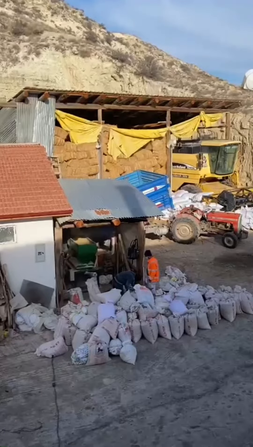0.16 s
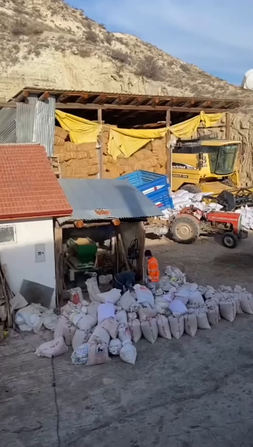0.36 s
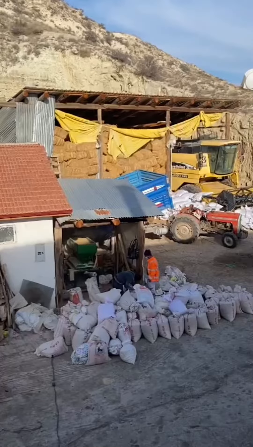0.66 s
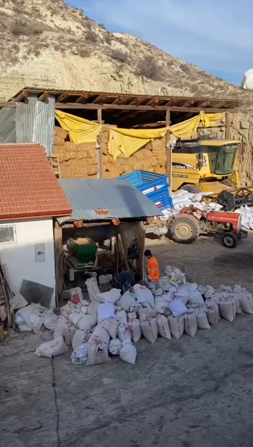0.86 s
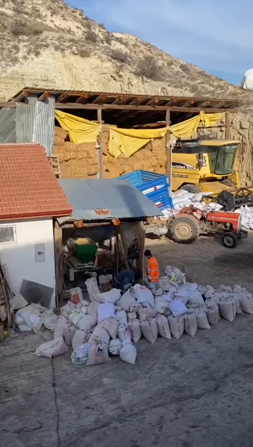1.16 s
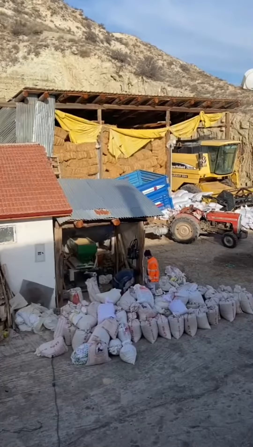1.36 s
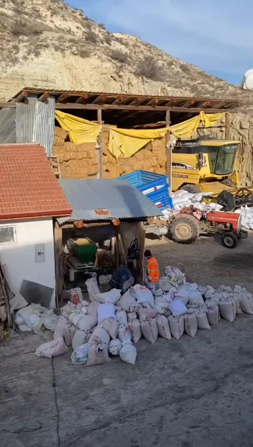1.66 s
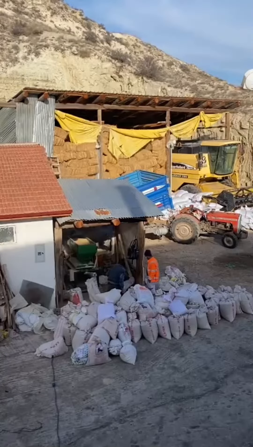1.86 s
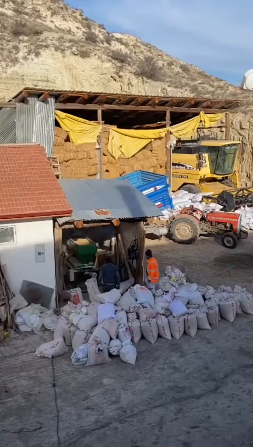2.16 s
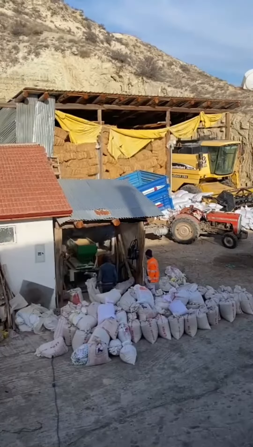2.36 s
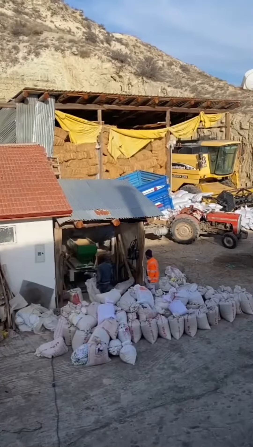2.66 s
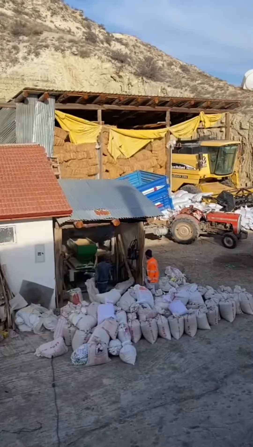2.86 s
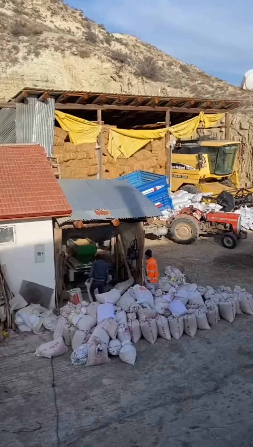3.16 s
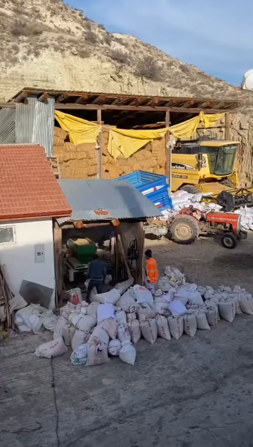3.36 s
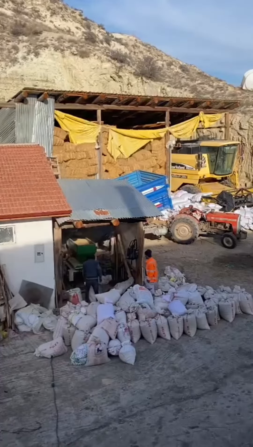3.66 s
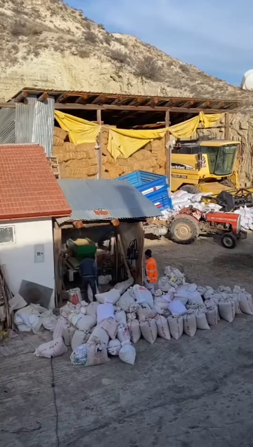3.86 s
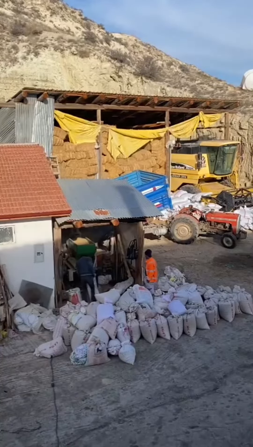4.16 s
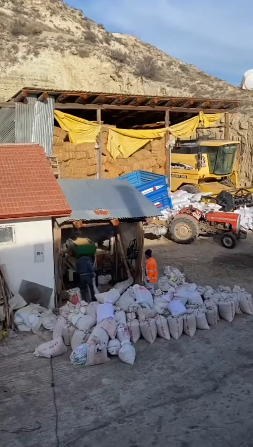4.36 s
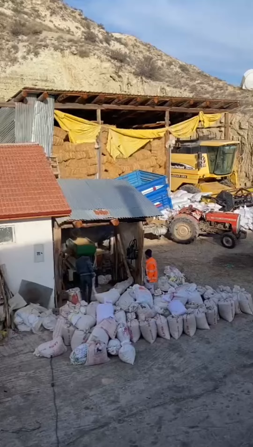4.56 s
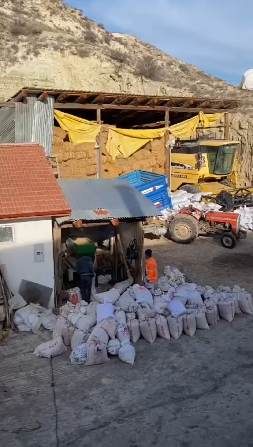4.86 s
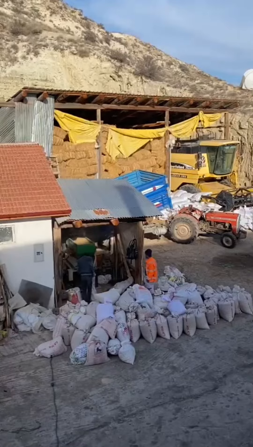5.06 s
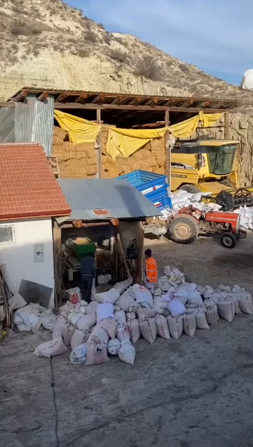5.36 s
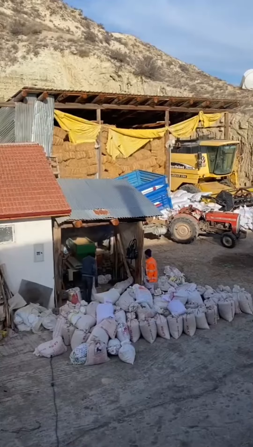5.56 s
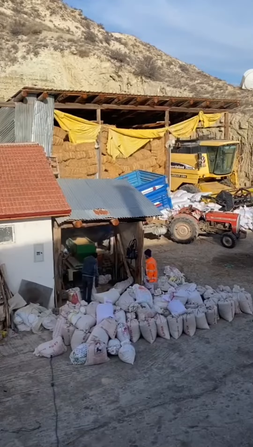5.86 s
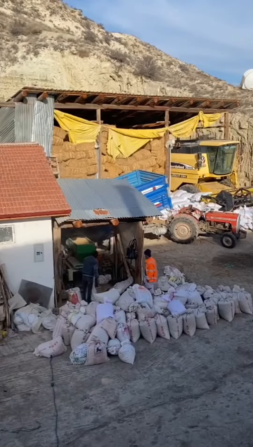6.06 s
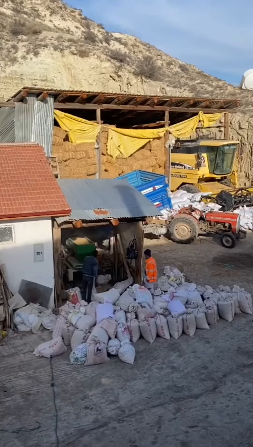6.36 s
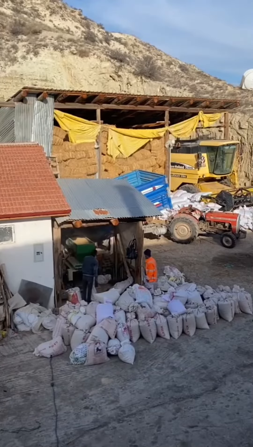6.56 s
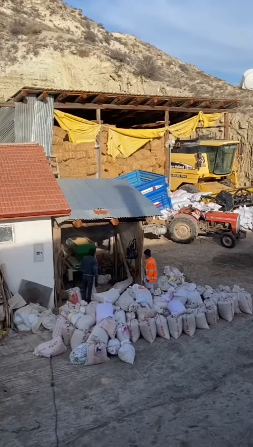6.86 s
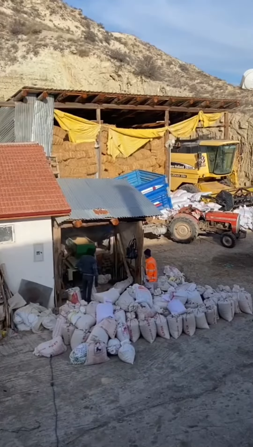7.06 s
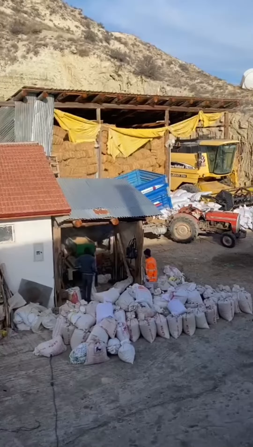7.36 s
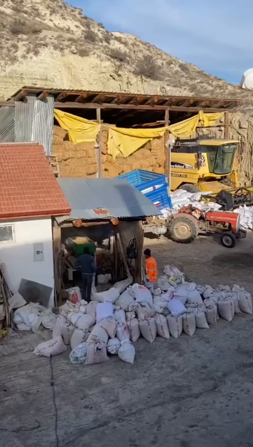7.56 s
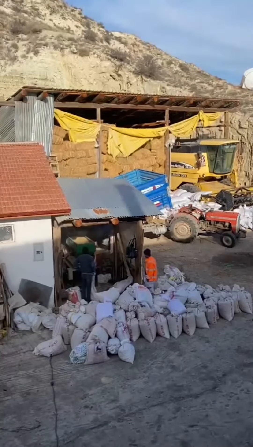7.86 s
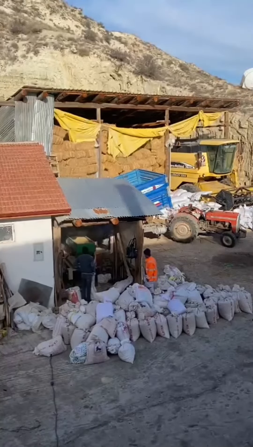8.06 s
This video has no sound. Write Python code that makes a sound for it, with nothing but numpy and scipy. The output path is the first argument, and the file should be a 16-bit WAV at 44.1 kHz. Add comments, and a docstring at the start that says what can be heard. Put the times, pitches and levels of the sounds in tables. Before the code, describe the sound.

A grain mill runs without a break, making a low rumble, a rough roar and a faint hum with a slight fast throb. Grain crunches through in quick, uneven surges, hissing and rattling the sheet metal. Soft knocks from the casing, brief rings from the steel hopper and small kernel clicks are scattered throughout. The sound dulls a little past the middle, then picks up again. It is heard across a farmyard on a handheld camera.

```python
"""A roar, a hum and a hiss of kernels: a grain mill running under a tin roof, across a farm yard.
The casing roars, the frame hums, and the main shaft throbs the noise once and twice a turn.
Surges of grain crunch through and rattle the sheet metal; the casing knocks, lumps ring the steel
hopper and hard kernels click on the sheet. Heard on a handheld camera, through two close
microphone ports that take in both straight and scattered sound."""
import sys
import numpy as np
from scipy import signal
from scipy.fft import rfft, irfft, next_fast_len
from scipy.io import wavfile
from scipy.ndimage import uniform_filter1d, map_coordinates

SR = 44100
rng = np.random.default_rng(int(sys.argv[2]) if len(sys.argv) > 2 else 0)


def dump(signal):
    """Clip the signal to [-1, 1] and save it as 16-bit WAV at the path in sys.argv[1]."""
    limited = np.clip(np.atleast_2d(signal).T, -1, 1)
    pcm = np.round(limited * 32767).astype(np.int16)
    wavfile.write(sys.argv[1], SR, pcm)


N = 362061
SHAFT_HZ, USUAL_LOAD_DB = 7.27, -34.5

# how hard the mill is fed: (time [s], load [dB], casing roar [dB])
MILL_LOAD = [(0.0, -31.5, -25), (0.82, -32.5, -25.5), (1.19, -32.5, -27), (1.51, -33, -25),
             (1.85, -30.5, -25), (2.17, -34.5, -27.5), (2.4, -32.5, -28.5), (2.7, -32.5, -26.5),
             (2.96, -35.5, -28.5), (3.06, -34, -28.5), (3.29, -33.5, -25.5), (3.68, -35.5, -27.5),
             (4.18, -35.5, -28.5), (4.64, -38, -27.5), (5.01, -36.5, -28.5), (5.33, -38, -28),
             (5.52, -37.5, -29), (5.6, -37.5, -28), (6.1, -37, -26.5), (6.3, -34.5, -26.5),
             (6.77, -34, -25), (7.11, -33.5, -26), (7.5, -37, -26.5), (7.8, -38, -26.5), (8.21, -34.5, -26)]
# the frame rumble's lowest band: (time [s], level [dB])
FRAME_LEVEL = [(0, -30), (.4, -28), (.65, -32.5), (.85, -29.5), (1.15, -34.5), (1.4, -30.5), (1.9, -30),
               (2.2, -32.5), (2.55, -31), (2.9, -31), (3.2, -30.5), (3.65, -33.5), (3.78, -29),
               (4.05, -32.5), (4.3, -30.5), (4.7, -33), (5.4, -31.5), (5.75, -32), (6.1, -33.5),
               (6.45, -30.5), (6.8, -32), (7, -31), (7.35, -30.5), (7.6, -31.5), (7.8, -35), (8.08, -28.5),
               (8.21, -39)]
# tones of the frame: (frequency [Hz], rms level [dB])
FRAME_TONES = [(58, -47.5), (65, -47), (86.5, -41), (101, -46.5), (114.3, -39.5), (137, -44.5),
               (267, -43.5), (278, -42.5)]
# resonances of frame, casing and hopper: (frequency [Hz], width [Hz], gain [dB])
BODY_RESONANCES = [(63, 10, 4), (86, 10, 4), (101, 6, 2), (114, 10, 5), (136, 12, 3), (166, 20, 5),
                   (200, 25, 3), (268, 18, 4.5), (320, 14, 3), (349, 22, 5), (410, 18, 5), (484, 35, 3.5),
                   (790, 60, 2), (940, 50, 4), (1001, 40, 5), (1300, 90, 4), (1576, 40, 3), (1800, 60, 3),
                   (2050, 90, 5), (2600, 120, 3), (2835, 60, 4), (3650, 90, 3), (5250, 110, 3),
                   (6450, 200, -4), (7620, 300, 1.5), (8370, 130, 2.5), (8850, 80, 1.5)]
# narrow valleys between them: (frequency [Hz], width [Hz], gain [dB])
BODY_VALLEYS = [(72.5, 7, -6), (96, 9.2, -3.5), (122, 5.2, -13.5), (178.6, 6.9, -5.5), (284, 9.7, -6.5),
                (306, 6.1, -2), (341, 10, -3.5), (437, 55, -5), (935, 18, -3), (256.6, 11, -1.5),
                (392, 16, -5.5), (970, 15, -0.5), (1075, 34, -4), (1400, 56, -5.5), (2120, 40, -5.5),
                (2420, 58, -6.5), (2900, 53, -2.5), (3240, 80, -2)]
# modes of the sheet-steel hopper: (frequency [Hz], relative level [dB], undamped t60 [s])
HOPPER_MODES = [(788, 1.5, 0.13), (942, 11.5, 0.13), (998.7, 9, 0.097), (1337, 6.5, 0.066),
                (1560, -2.5, 0.081), (1690, -6.5, 0.064), (1825, -14.5, 0.069), (2052, 7.5, 0.073),
                (2160, 7, 0.099), (2226, -2, 0.11), (2583, 2.5, 0.074), (2710, 4, 0.05),
                (2840, -1.5, 0.086), (3108, -4, 0.055), (3673, -6, .06), (4470, -10, .06),
                (4870, -10, .064), (5130, -7.5, 0.058), (5270, -7, 0.058), (5700, -6.5, .05),
                (5900, -8, .05)]

# frame rumble: (frequency [Hz], relative level [dB])
RUMBLE_SPECTRUM = [(15, -61), (28, -33), (45, -19), (58, -6), (100, 1.5), (200, 1.5), (300, -5.5),
                   (450, -55)]
# casing roar: (frequency [Hz], relative level [dB])
ROAR_SPECTRUM = [(150, -19.5), (250, -1.5), (400, 1.5), (700, -4), (1020, -6.5), (1080, -7.5), (1360, -11),
                 (1420, -18), (2000, -44)]
# grain being ground: (frequency [Hz], relative level [dB])
GRIND_SPECTRUM = [(1000, -52), (1400, -2), (2200, -0.5), (2420, -3.5), (2700, -3.5), (3200, -5),
                  (3700, -10), (4500, -32)]
# kernels thrown against the steel screen: (frequency [Hz], relative level [dB])
SPRAY_SPECTRUM = [(2800, -33.5), (3700, -0.5), (4500, 0), (5800, -3), (6400, -4.5), (7200, -24.5)]
# kernel hiss: (frequency [Hz], relative level [dB])
HISS_SPECTRUM = [(4500, -32), (6300, -11), (6800, 3.5), (8800, -0.5), (9300, -4), (10500, -3), (11500, -21),
                 (12000, -42)]
# loose sheet rattling: (frequency [Hz], relative level [dB])
RATTLE_SPECTRUM = [(5000, -36), (6400, 3), (6900, 3), (8000, -2), (9000, -1), (9400, -10.5), (11500, -14.5),
                   (12000, -37)]
# a surge crunching through: (frequency [Hz], relative level [dB])
CRUNCH_SPECTRUM = [(250, -10), (600, 6.5), (1000, -1), (1100, -0.5), (1500, -7), (2500, -6.5),
                   (3500, -10.5), (4500, -28)]
# a knock of the casing: (frequency [Hz], relative level [dB])
KNOCK_SPECTRUM = [(120, -29), (200, -0.5), (350, 4), (600, -2.5), (900, -10), (1300, -37.5)]
# a click on the sheet: (frequency [Hz], gain [dB])
CLICK_SPECTRUM = [(3000, -33), (4500, -2), (6300, -4), (7000, 8), (9000, 0.5), (10500, -8.5), (12000, -18)]

# heavy surges of grain: (start [s], hold [s], sheet rattle [dB], spray [dB], crunch [dB])
HEAVY_SURGES = [(0.04, 0.025, -43, -37, -43), (0.099, 0.022, -37.5, -42, -34),
                (0.252, 0.016, -43, -43, -32), (0.46, .022, -38, -37, -30.5),
                (0.513, 0.013, -39.5, -46, -27), (0.647, 0.021, -39, -39, -30.5),
                (0.726, .015, -46, -38, -38), (0.789, .01, -39.5, -45, -28.5),
                (0.87, 0.014, -40, -38.5, -46), (0.995, 0.032, -47, -44, -50),
                (1.116, 0.0093, -41, -41, -43), (1.216, 0.019, -42, -41, -35.5),
                (1.275, 0.016, -45, -46, -32), (1.428, 0.012, -47, -42, -41), (1.688, 0.036, -42, -45, -32),
                (1.744, 0.022, -42, -41, -31), (1.902, 0.036, -40, -37, -27), (1.965, .04, -47, -39, -29),
                (2.346, 0.063, -47, -42, -47), (2.725, 0.02, -45, -44, -27.5),
                (3.083, 0.015, -41, -41.5, -29.5), (3.145, 0.026, -42, -45, -30),
                (3.211, 0.024, -47, -39.5, -34.5), (3.282, 0.014, -42, -41, -32),
                (3.355, .022, -39.5, -43, -38), (3.425, 0.02, -38, -39, -29), (3.5, 0.015, -36, -45, -46),
                (3.529, 0.011, -45, -40, -47), (3.648, .018, -40, -42.5, -45),
                (3.764, 0.014, -43, -44.5, -38), (4.291, 0.05, -42.5, -45, -34.5),
                (4.72, 0.022, -53, -44.5, -44), (4.808, 0.038, -47, -46, -34.5),
                (4.923, 0.018, -50, -43, -37.5), (5.063, 0.013, -50, -48, -34),
                (5.157, 0.019, -48, -50, -37), (5.248, 0.032, -51, -48, -33.5),
                (5.664, 0.02, -44, -46.5, -31.5), (5.705, 0.013, -42, -44, -37),
                (5.832, 0.011, -53, -51, -29), (5.962, .02, -47, -43, -29.5),
                (6.003, 0.026, -41, -40.5, -32), (6.543, 0.022, -52, -44, -42), (6.623, .03, -41, -37, -28),
                (6.795, .021, -44, -39.5, -29), (6.911, .025, -38.5, -43.5, -31),
                (7.055, .028, -49, -48, -28.5), (7.181, 0.063, -42.5, -42, -29.5),
                (7.457, 0.037, -40, -41, -27.5), (7.598, 0.053, -46, -44, -32), (7.733, .02, -46, -48, -33),
                (7.87, 0.024, -46, -42.5, -37), (8.035, 0.014, -46, -39, -31)]
# low knocks of the casing: (middle time [s], level [dB])
CASING_KNOCKS = [(0.059, -26), (0.33, -24), (0.43, -23), (0.53, -22.5), (0.879, -25.5), (0.955, -26.5),
                 (1.113, -40), (1.775, -24.5), (1.928, -26.5), (1.986, -32.5), (2.355, -26), (2.53, -29),
                 (2.73, -32), (3.03, -25.5), (3.441, -24.5), (4.23, -29), (4.39, -27.5), (4.846, -28.5),
                 (4.93, -26.5), (5.277, -27.5), (5.7, -24), (5.74, -31), (5.989, -25.5), (6.272, -26.5),
                 (6.65, -25), (7.206, -25), (7.29, -30.5), (7.37, -25), (7.614, -23), (7.886, -24.5),
                 (8.034, -26.5)]
# lumps hitting the hopper: (time [s], level [dB], brightness [dB/octave], favoured frequency [Hz])
HOPPER_HITS = [(.225, -33, 4, 990), (.39, -34, 2, 942), (.508, -30, 2, 788), (.787, -27, -2, 2070),
               (1.07, -39, 3, 2030), (1.2, -33.5, 4, 970), (1.63, -36, 5, 942), (1.752, -34, -1.5, 2100),
               (1.892, -23, -4, 788), (2.055, -36, 0, 990), (2.595, -34, -4, 942), (2.718, -31.5, 7, 942),
               (2.84, -38, -1, 970), (3.145, -31, -5, 788), (3.147, -40, 0, 1690), (3.185, -32, 1, 975),
               (3.285, -40, 0, 997), (3.415, -23, -3, 2780), (3.424, -39, -12, 788), (3.44, -34, -2, 942),
               (4.165, -43, 6, 2052), (4.75, -39, -2, 2052), (5.41, -37, -2, 955), (5.965, -47, 7, 2800),
               (6.635, -56, 1, 788), (6.64, -45, 6, 2840), (6.856, -41, 5, 2160), (7.085, -44, 4, 2710),
               (7.19, -39, 12, 2720), (7.472, -35, 1, 2052)]
# single hard kernels on the sheet: (time [s], level before colouring [dB])
KERNEL_HITS = [(0.468, -35), (0.885, -36), (1.001, -38), (1.009, -33.5), (1.034, -36), (1.711, -35.5),
               (1.959, -35.5), (2.406, -33), (3.155, -36), (3.367, -35), (3.429, -23), (3.437, -33),
               (3.506, -33.5), (3.519, -32), (3.644, -32.5), (3.658, -32.5), (3.766, -38), (5.044, -38),
               (5.168, -36), (5.216, -41), (5.451, -37.5), (5.672, -43), (5.751, -40), (6.011, -37),
               (6.032, -41), (6.634, -37), (6.645, -40), (6.921, -38), (6.937, -38), (7.458, -37),
               (7.463, -36), (7.473, -36), (8.049, -40)]

# phase between the microphone ports: (frequency [Hz], left lead [turns])
PORT_LEAD = [(2250, 0), (2500, .055), (2850, 0), (4000, .02), (4400, .1), (4750, 0), (5400, .015),
             (5600, .055), (5800, .17), (6120, .28), (6420, .5), (8050, .5), (8350, .62), (8870, .73),
             (9250, .92), (9700, 1)]
# likeness of the two ports: (frequency [Hz], correlation [0..1])
PORT_LIKENESS = [(125, 1), (200, .995), (430, .985), (1800, .997), (2150, .995), (2480, .85), (2850, .99),
                 (3100, .96), (3350, .998), (3700, .95), (4400, .78), (4750, .9999), (5200, .9995),
                 (5500, .93), (6100, .58), (6450, 1), (7950, 1), (8300, .83), (9050, .56), (9500, .9),
                 (9850, .9995)]
# balance of the ports: (frequency [Hz], left minus right [dB])
PORT_BALANCE = [(120, 0), (280, -.7), (450, 1), (600, 3.4), (800, 4.2), (1300, 2.7), (1900, .1), (2350, 0),
                (2600, 2), (2950, -.5), (3300, 0)]


def amp(db):
    return 10 ** (np.asarray(db) / 20)


def unit_rms(x):
    return x / np.sqrt(np.mean(x ** 2) + 1e-20)


def along(points, hz):
    """Read (Hz, value) points on a log frequency axis."""
    f, v = np.transpose(points)
    return np.interp(np.log(hz + 1), np.log(f + 1), v)


def timeline(table, column=1):
    """One column of a timed table, at every sample."""
    columns = np.transpose(table)
    return np.interp(np.arange(N) / SR, columns[0], columns[column])


def wobble(rate):
    """A smooth random curve, rate knots a second."""
    return map_coordinates(rng.standard_normal(int(N * rate / SR) + 4), [np.arange(N) * rate / SR])


def filtered(x, response):
    """x times a complex response of frequency."""
    size = next_fast_len(N + 8192)
    return irfft(rfft(x, size) * response(np.fft.rfftfreq(size, 1 / SR)), size)[..., :N]


def body_gain(hz):
    """The mill's resonances and the valleys between them."""
    bands = BODY_RESONANCES + BODY_VALLEYS
    return amp(sum(db / (1 + (2 * (hz - centre) / width) ** 2) for centre, width, db in bands))


def body_noise(spectrum, patchy_db, grain_db):
    """Patchy, grainy noise through the mill's body, rms 1; rows are the straight and scattered paths."""
    cells = signal.stft(rng.standard_normal((2, N)), nperseg=512)[2]
    patches = uniform_filter1d(rng.standard_normal(cells.shape[1:]), size=8, axis=0)
    patches = unit_rms(uniform_filter1d(patches, size=8, axis=1))
    paths = signal.istft(cells * amp(patchy_db * patches), nperseg=512)[1][:, :N]
    grains = amp(grain_db * wobble(900))  # single kernels crack within about a millisecond
    colour = lambda hz: amp(np.clip(along(spectrum, hz), -120, 20)) * body_gain(hz)
    return unit_rms(filtered(paths * grains, colour))


def swell(t, hold, rise, fall):
    """A quick rise up to time 0, a hold, then an exponential fall; all in seconds."""
    return np.exp(-(np.minimum(t, 0) / rise) ** 2 - np.maximum(t - hold, 0) / fall)


def throb(once_db, twice_db):
    """Level swing once and twice a turn of the shaft."""
    turn = 2 * np.pi * SHAFT_HZ * np.arange(N) / SR
    return once_db * np.cos(turn + 3.4) + twice_db * np.cos(2 * turn + 1.7)


def frame_rumble():
    """The frame shakes low down, throbbing mostly twice a turn."""
    level_db = timeline(FRAME_LEVEL) + 2.5 + throb(0.11, 0.71)  # all bands: 2.5 dB over the lowest
    return amp(level_db) * body_noise(RUMBLE_SPECTRUM, patchy_db=0.8, grain_db=0.4)


def casing_roar(feed, lumps):
    """The casing roars, swaying with the uneven feed."""
    level_db = timeline(MILL_LOAD, column=2) + 0.57 * lumps + 0.094 * feed + throb(0.7, 0.3)
    return amp(level_db) * body_noise(ROAR_SPECTRUM, patchy_db=0.72, grain_db=1.5)


def hopper_pings(rate, spread_db, above_hz=0):
    """Stray kernels, some harder than others, ring each hopper mode rate times a second; rms 1."""
    hz, db, t60 = np.transpose(HOPPER_MODES)
    t, out = np.arange(SR // 8) / SR, np.zeros((2, N))
    for k in np.flatnonzero(hz > above_hz):
        draw = rng.random((2, N)) * SR / rate  # under 1 where a kernel lands
        blows = (draw < 1) * amp(db[k] - spread_db * np.log(draw + .04))
        ring = amp(-60 * t / t60[k]) * np.sin(2 * np.pi * hz[k] * t)
        out += signal.oaconvolve(blows, ring[None], axes=1)[:, :N]
    return unit_rms(out)


def grinding(load_db, feed, lumps):
    """Grain grinds in the midrange while stray kernels ping the hopper."""
    level_db = -36 + 0.61 * load_db
    sway_db = 0.56 * lumps + 0.99 * feed + throb(0.4, 0.095)
    grind = amp(level_db + sway_db) * body_noise(GRIND_SPECTRUM, patchy_db=1.4, grain_db=0.5)
    return grind + amp(level_db - 4) * hopper_pings(rate=45, spread_db=4.5)


def screen_spray(load_db, feed):
    """Kernels spray against the steel screen, with a tinkle from the hopper's high modes."""
    level_db = -44.5 + 0.99 * load_db
    sway_db = 0.5 * wobble(8) + 0.54 * feed + 0.61 * wobble(18) + throb(0.58, 0.23)
    spray = amp(level_db + sway_db) * body_noise(SPRAY_SPECTRUM, patchy_db=1.0, grain_db=-0.5)
    tinkle = amp(level_db - 5.5 + wobble(6.5)) * hopper_pings(rate=30, spread_db=3.0, above_hz=3000)
    return spray + tinkle


def kernel_hiss(load_db, feed):
    """Kernels hiss at the top; this rises fastest with load, so a loaded mill is brighter."""
    level_db = -48.5 + 1.57 * load_db
    sway_db = 0.7 * wobble(8.8) + 1.1 * feed + 1.1 * wobble(20) + throb(0.76, 0.98)
    return amp(level_db + sway_db) * body_noise(HISS_SPECTRUM, patchy_db=3.0, grain_db=1.0)


def frame_hum(waver_hz=0.817, waver_db=2):
    """The frame's tones waver in pitch and level and partly follow its rumble."""
    tones = np.zeros(N)
    for hz, db in FRAME_TONES:
        level = amp(db + waver_db * wobble(2.54))
        cycles = np.cumsum(hz + waver_hz * wobble(3)) / SR + rng.random()
        tones += level * np.sqrt(2) * np.sin(2 * np.pi * cycles)
    frame_db = timeline(FRAME_LEVEL)
    follow = amp(0.6 * (frame_db - frame_db.mean()))
    return np.array([[1], [0]]) * follow * tones  # straight path only


def light_surges(load_db, jitter_s=0.012, hold_s=0.033):
    """Each half turn with no heavy surge throws a light one that follows the load; rows as HEAVY_SURGES."""
    beats = np.arange(0.038, N / SR - .02, .5 / SHAFT_HZ)
    starts = beats + jitter_s * rng.standard_normal(len(beats))
    levels_db = np.array([-52, -50.5, -35.5]) + load_db[(beats * SR).astype(int), None]
    levels_db[::2] -= 5  # one half of the turn throws less grain
    gap_s = np.abs(beats[:, None] - np.transpose(HEAVY_SURGES)[0]).min(axis=1)
    return np.column_stack([starts, np.full(len(beats), hold_s), levels_db])[gap_s > .25 / SHAFT_HZ]


def grain_surges(load_db):
    """Each surge strikes suddenly, holds and dies away; deeper layers start and end more softly."""
    t, levels = np.arange(N) / SR, np.zeros((3, N))  # rattle, spray, crunch
    rise, fall = np.array([[.003], [.005], [.008]]), np.array([[.012], [.015], [.02]])
    for start, hold, *layers_db in [*HEAVY_SURGES, *light_surges(load_db)]:
        near = slice(max(round((start - .05) * SR), 0), round((start + .25) * SR))
        levels[:, near] += amp(layers_db)[:, None] * swell(t[near] - start - rise, hold, rise, fall)
    chatter = amp(0.9 * wobble(140))  # the loose sheet slaps several times in each surge
    rattle = chatter * body_noise(RATTLE_SPECTRUM, patchy_db=2.0, grain_db=1.0)
    spray = body_noise(SPRAY_SPECTRUM, patchy_db=0.7, grain_db=1.0)
    crunch = body_noise(CRUNCH_SPECTRUM, patchy_db=0.5, grain_db=2.5)
    ring = amp(-6.5) * hopper_pings(rate=150, spread_db=2.5)
    thud = amp(-7) * body_noise(RUMBLE_SPECTRUM, patchy_db=-1.0, grain_db=0.3)
    return levels[0] * rattle + levels[1] * spray + levels[2] * (crunch + ring + thud)


def casing_knocks():
    """The casing thumps softly, in short swells of low noise."""
    t, level = np.arange(N) / SR, np.zeros(N)
    for middle, db in CASING_KNOCKS:
        start = middle - .01
        near = slice(max(round((start - .05) * SR), 0), round((start + .2) * SR))
        level[near] += amp(db) * swell(t[near] - start, hold=0.016, rise=0.011, fall=0.011)
    return level * body_noise(KNOCK_SPECTRUM, patchy_db=-0.5, grain_db=4.5)


def hopper_clangs(favour_db=9, favour_octaves=0.063):
    """Each lump rings all hopper modes at once; those near its favoured frequency stand out."""
    hz, mode_db, t60 = np.transpose(HOPPER_MODES)[:, :, None]
    t, out = np.arange(SR // 8) / SR, np.zeros((2, N + SR))
    decay = amp(-60 * t / (0.54 * t60))  # grain lying on the steel shortens its ring
    attack = 1 - np.exp(-t / 0.0085)
    for start, level_db, brightness, favoured_hz in HOPPER_HITS:
        boost_db = favour_db / (1 + (np.log2(hz / favoured_hz) / favour_octaves) ** 4)
        tilt_db = brightness * np.log2(hz / 1000)
        scatter, phase = rng.standard_normal((2, 2, len(hz), 1))
        strength = amp(level_db + mode_db + boost_db + tilt_db + 0.94 * scatter)
        modes = strength * attack * decay * np.sin(2 * np.pi * (hz * t + phase))
        out[:, round(start * SR):][:, :len(t)] += modes.sum(axis=1)
    return out[:, :N]


def kernel_clicks(decay_s=0.0008):
    """Hard kernels snap against the sheet: each a short, sharp crack."""
    t, out = np.arange(SR // 200) / SR, np.zeros((2, N + SR))
    for start, db in KERNEL_HITS:
        crack = rng.standard_normal((2, len(t))) * np.exp(-t / decay_s)
        out[:, round(start * SR):][:, :len(t)] += amp(db) * np.array([unit_rms(path) for path in crack])
    return filtered(out[:, :N], lambda hz: amp(along(CLICK_SPECTRUM, hz)) * body_gain(hz))


def microphone_ports(straight, scattered):
    """Both paths reach the two ports with a lead and a balance that depend on pitch."""
    sides = np.array([[1], [-1]])  # left, right
    balance = lambda hz: amp(sides * along(PORT_BALANCE, hz) / 2)
    port = lambda hz: balance(hz) * np.exp(1j * np.pi * sides * along(PORT_LEAD, hz))
    mix_angle = lambda hz: np.arccos(np.clip(along(PORT_LIKENESS, hz), 0, 1)) / 2
    return (filtered(straight, lambda hz: port(hz) * np.cos(mix_angle(hz)))
            + filtered(scattered, lambda hz: sides * port(hz) * np.sin(mix_angle(hz))))


def scene():
    """The whole mill, heard from across the yard."""
    load_db = timeline(MILL_LOAD) - USUAL_LOAD_DB
    feed, lumps = wobble(22), wobble(7)  # uneven feeding moves the steady layers partly together
    running = frame_rumble() + casing_roar(feed, lumps) + grinding(load_db, feed, lumps)
    running += screen_spray(load_db, feed) + kernel_hiss(load_db, feed) + frame_hum()
    impacts = grain_surges(load_db) + casing_knocks() + hopper_clangs() + kernel_clicks()
    straight, scattered = running + impacts
    return microphone_ports(straight, scattered)


def record(dry):
    """The camera's treble rolls off just under its band limit."""
    return filtered(dry, lambda hz: amp(-14 * np.clip((hz - 11400) / 450, 0, 1) ** 2) * (hz < 11850))


dry = scene()
out = record(dry)
dump(out)
```